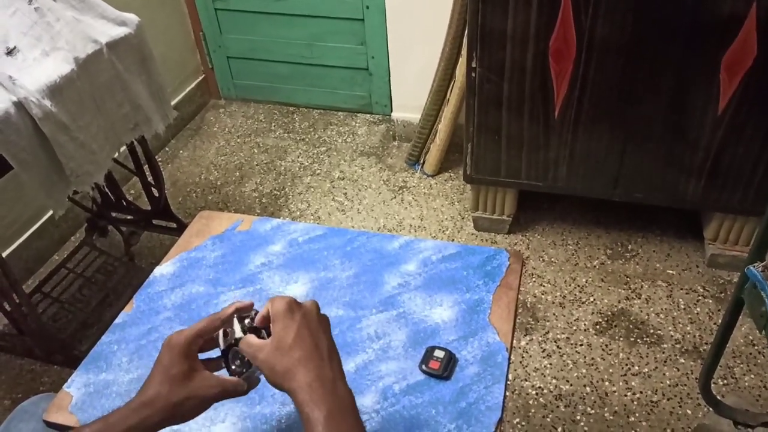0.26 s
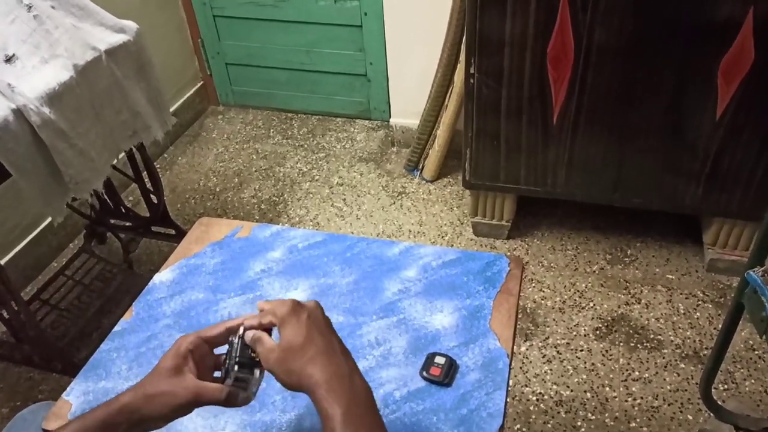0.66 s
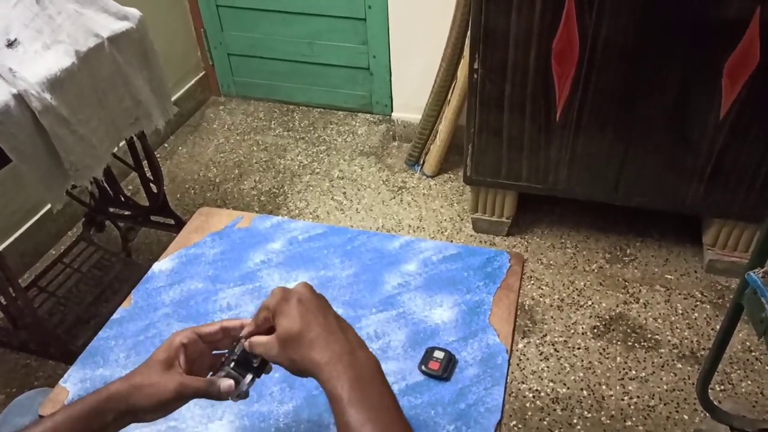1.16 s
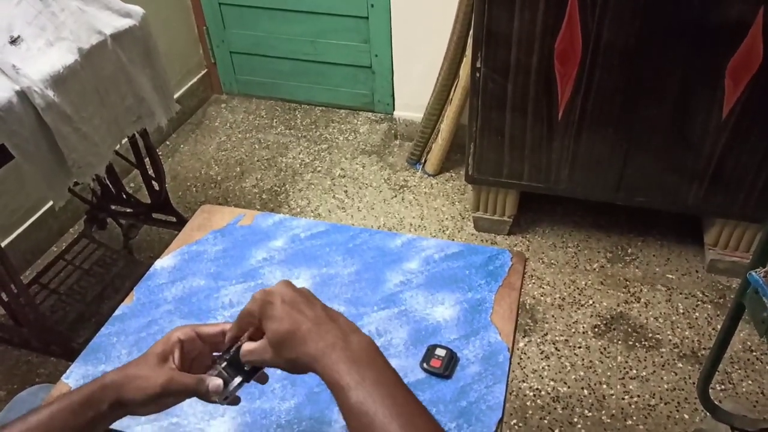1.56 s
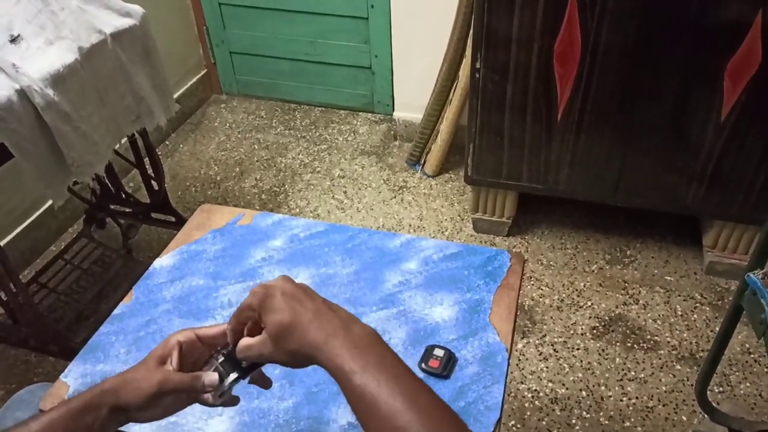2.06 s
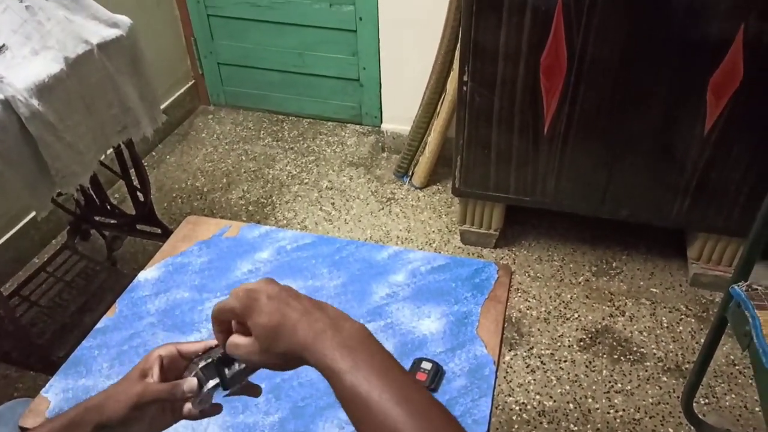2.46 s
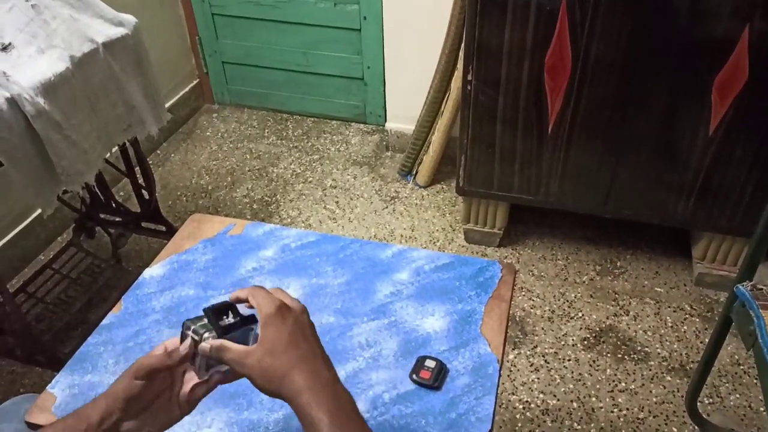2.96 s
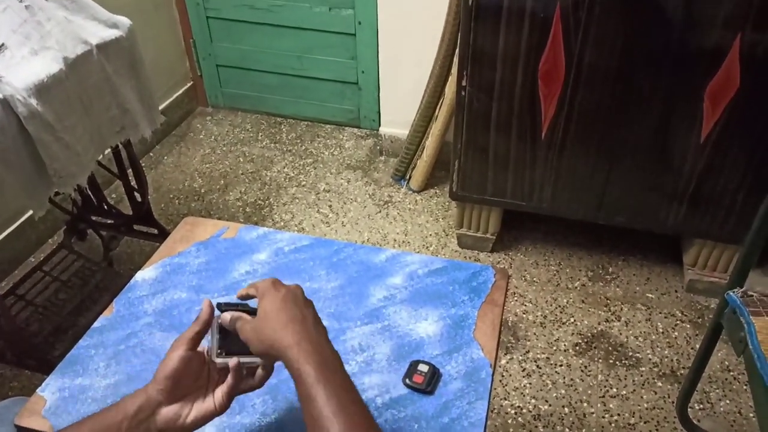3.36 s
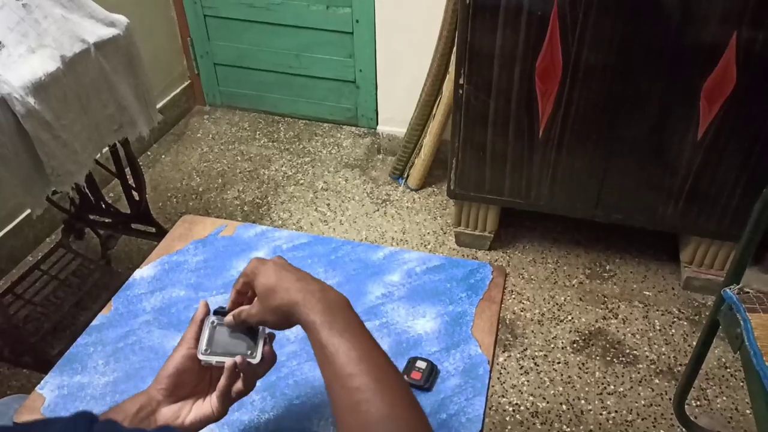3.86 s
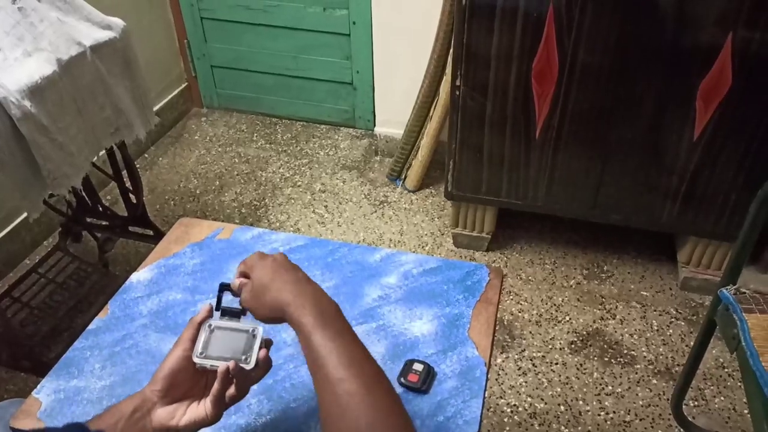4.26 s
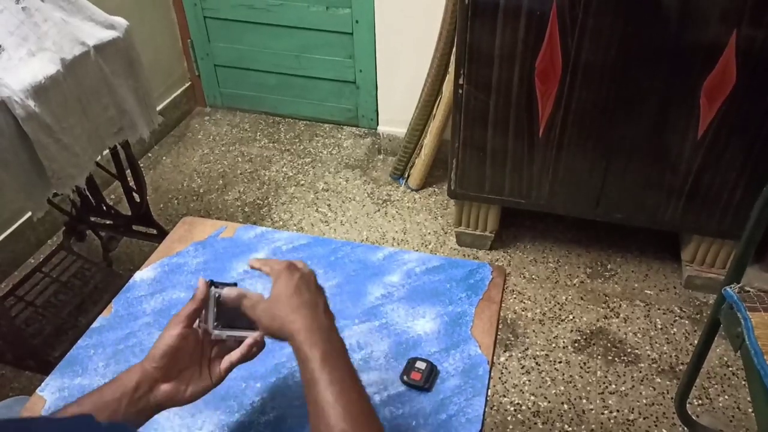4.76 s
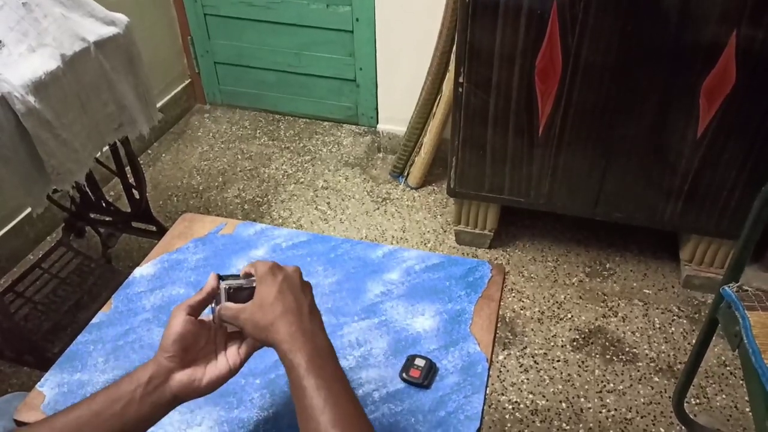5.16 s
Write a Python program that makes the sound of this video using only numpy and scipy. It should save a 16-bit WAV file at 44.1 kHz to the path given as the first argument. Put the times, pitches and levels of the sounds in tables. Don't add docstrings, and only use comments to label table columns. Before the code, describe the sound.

Hands open and shut a small hard plastic case with sharp ringing snaps and light taps in a bare tiled room over a low hum.

```python
import sys
import numpy as np
from scipy import signal
from scipy.fft import rfft, irfft
from scipy.io import wavfile
from scipy.ndimage import uniform_filter1d

SR = 44100
rng = np.random.default_rng(int(sys.argv[2]) if len(sys.argv) > 2 else 0)


def how_loud(loudness_db):
    steps = np.asarray(loudness_db, float) / 20
    return 10 ** steps


def int16_out(signal):
    q = np.round(np.clip(np.atleast_2d(signal).T, -1, 1) * 32767)
    wavfile.write(sys.argv[1], SR, q.astype(np.int16))


N = 238140
RING = 2 ** 14
TAIL = 15000
LEAD = 440


def on_log(table, hz):
    table_hz, value = np.transpose(table)
    return np.interp(np.log(hz + 1), np.log(table_hz), value)


def add(out, sound, start_s):
    i = int(start_s * SR - LEAD)
    out[:, i:i + sound.shape[1]] += sound[:, :N - i]


def walk(rate_hz):
    hold = int(SR / rate_hz)
    steps = np.repeat(rng.standard_normal(N // hold + 1), hold)
    return uniform_filter1d(uniform_filter1d(steps, hold), hold)[:N]


# pitch_hz, level_db
AIR_SPECTRUM = [(25, -31.5), (50, -20), (90, -8.5), (150, -5.5), (300, -10.5), (500, -13), (800, -17),
                (1400, -24.5), (3000, -27.5), (4400, -26.5), (8000, -31.5), (16000, -35.5)]
# pitch_hz, width_hz, level_db over the air
ROOM_HUM = [(112, 10.8, 10.5), (141, 8.5, 12), (174, 13.9, 6), (198.5, 4.7, 9), (282.3, 14.4, 10.5),
            (437, 71, 2.5)]
# pitch_hz, likeness (0-1)
EAR_LIKENESS = [(50, 0), (130, 0.9), (290, 0.68), (640, 0.34), (1500, 0), (16000, 0)]
# start_s, bustle_db
HAND_STIR = [
    (0.0, -68),
    (1.62, -71),
    (2.45, -67),
    (3.102, -70),
    (4.0, -67.5),
    (5.4, -68.5),
]


def room_tone():
    hz = np.fft.rfftfreq(N, 1 / SR)
    hum = 1 + sum(how_loud(db) ** 2 / (1 + (2 * (hz - f) / w) ** 2) for f, w, db in ROOM_HUM)
    like = np.clip(on_log(EAR_LIKENESS, hz), 0, 1)
    mid, side = rfft(rng.standard_normal((2, N))) * np.sqrt([1 + like, 1 - like])
    both = np.array([mid + side, (mid - side) * how_loud(-0.5)])
    both = both * how_loud(on_log(AIR_SPECTRUM, hz)) * np.sqrt(hum)

    part = np.clip(np.log(hz / 150 + 1e-9) / np.log(5), 0, 3)
    stir_db = np.interp(np.arange(N) / SR, *np.transpose(HAND_STIR))
    stir_db = stir_db - stir_db.mean()
    out = 0
    for k, stir_share in enumerate((0.1, 0.89, 0.262, 0.05)):
        swell_db = 1.2 * walk(3.1) + stir_share * stir_db
        crossfade = np.clip(1 - np.abs(part - k), 0, 1)
        out = out + irfft(both * crossfade, N) * how_loud(swell_db)
    return out * how_loud(-54) / np.sqrt(np.mean(out ** 2))


# delay_s, level_db
NEAR_ECHOES = [(.0017, -5.5), (.007, -8), (0.0105, -5.5), (0.0152, -8.5)]


def heard(t60_s, direct_db, echo_db, scatter):
    t = (np.arange(TAIL) - LEAD) / SR
    build = 1 - np.exp(-(t / 0.006) ** 2)
    fade_out = np.minimum((t[-1] - t) / 0.08, 1)
    tail = build * 1000.0 ** (-t / t60_s) * fade_out
    lead_in = how_loud(direct_db - 41) * np.exp(np.minimum(t, 0) / 0.004)
    path = scatter * np.where(t < 0, lead_in, tail)

    right_lag = 6
    path[0, LEAD] += how_loud(direct_db - 1.5)
    path[1, LEAD + right_lag] += how_loud(direct_db)
    left_lags = (5, -6, 19, -33)
    for (delay_s, db), each_db, lag in zip(NEAR_ECHOES, echo_db, left_lags):
        i = LEAD + int(delay_s * SR)
        path[[0, 1], [i + lag, i]] += how_loud(db + each_db) * np.array([1, -1])
    return rfft(path, RING)


def resonances(modes, hz, detune, scatter_db):
    ring = 0
    for k, ((f, w, db), d, s) in enumerate(zip(modes, detune, scatter_db)):
        mode = 1j * hz * w / ((f * d) ** 2 - hz ** 2 + 1j * hz * w)
        ring = ring + (-1) ** k * how_loud(db + s) * mode
    return ring / np.sqrt(np.mean(np.abs(ring) ** 2))


# pitch_hz, width_hz, level_db
LID_MODES = [(550, 120, -4.5), (844, 300, -10), (1218, 225, 1.8), (1340, 355, 1), (1789, 120, -2),
             (2150, 280, -7)]
SHELL_MODES = [(2513, 650, -8), (3210, 340, -1), (3755, 510, -2), (4150, 235, -1), (4360, 310, -3.9),
               (5570, 240, -1)]
LATCH_MODES = [(4650, 550, -18.5), (5355, 520, -2), (6280, 490, 3.7), (6900, 370, 3.5), (7670, 500, 3),
               (8540, 1140, -4)]
EDGE_MODES = [(9110, 420, 7), (11900, 1300, -3), (14200, 1100, -5), (15000, 400, -5)]
PART_T60_S = [0.35, 0.41, 0.34, 0.3]
PART_FACING_DB = [-0.5, -4, 2.5, 1]


def blow(*levels_db, direct_db):
    hz = np.fft.rfftfreq(RING, 1 / SR)
    grip = rng.standard_normal((4, 2, 6))
    echo_db = 26.2 + 0.54 * rng.standard_normal((4, 2))
    parts = (LID_MODES, SHELL_MODES, LATCH_MODES, EDGE_MODES)
    out = 0
    for modes, db, t60_s, facing_db, (shift, damp) in zip(
            parts, levels_db, PART_T60_S, PART_FACING_DB, grip):
        ring = resonances(modes, hz, 1 + 0.012 * shift, 1.5 * damp)
        glints = how_loud(2.08 * rng.standard_normal((2, TAIL)))
        scatter = rng.standard_normal((2, TAIL)) * glints
        out = out + how_loud(db - 0.5) * ring * heard(t60_s, direct_db + facing_db, echo_db, scatter)
    small_hz = 600
    return irfft(out * (1j * hz / (1j * hz + small_hz)) ** 2, RING)


# start_s, lid_db, shell_db, latch_db, edge_db
OPEN_HAND_SNAPS = [
    (0.6123, -49.5, -39, -33, -35.5),
    (2.572, -66, -55.5, -57, -56),
]
CUPPED_HAND_SNAPS = [
    (0.0754, -50, -29.5, -28.5, -34),
    (2.382, -51, -36, -22, -28.5),
    (4.4923, -40.5, -30, -26.5, -27),
]


def snaps(out):
    for table, direct_db in ((OPEN_HAND_SNAPS, 30), (CUPPED_HAND_SNAPS, 24.5)):
        for start_s, *levels_db in table:
            add(out, blow(*levels_db, direct_db=direct_db), start_s + 0.0006)


def lone_mode(hz, width_hz, t60_s):
    ring = resonances([(hz, width_hz, 0)], np.fft.rfftfreq(RING, 1 / SR), [1], [0]) ** 2
    ring = ring / np.sqrt(np.mean(np.abs(ring) ** 2))
    path = heard(t60_s, 26, np.full((4, 2), 21.0), rng.standard_normal((2, TAIL)))
    return irfft(ring * path, RING)


# [(start_s, level_db), ..]
PALM_TONES = [
    (198, 49, 0.12, [(2.55, -46.5)]),
    (280, 59, 0.51, [(2.534, -59)]),
    (473, 160, 0.35, [(2.534, -58.5)]),
    (836, 225, 0.66, [(2.534, -55.5), (3.277, -62), (3.64, -62.5), (3.813, -60), (3.932, -62), (4.494, -51.5)]),
]
LID_TONES = [
    (1125, 120, 0.32, [(4.494, -40)]),
    (1298, 130, .32, [(.076, -47.5), (.613, -51), (4.203, -61.5)]),
    (1458, 190, 0.21, [(2.383, -58.5), (3.277, -65.5), (4.929, -68), (4.987, -48.5)]),
    (1804, 210, 0.37, [(.076, -47), (4.494, -47.5)]),
]
SHELL_TONES = [
    (3250, 200, .2, [(2.865, -65)]),
    (3700, 226, .25, [(1.22, -57), (2.183, -55)]),
    (3460, 150, 0.45, [(.958, -58.5), (1.213, -63), (3.82, -66), (4.494, -42)]),
    (3900, 500, 0.35, [(.076, -33.5), (.613, -42.5)]),
    (4820, 1140, .37, [(2.383, -30.5), (4.494, -31.5)]),
    (4730, 91, 0.35, [(4.987, -49.5)]),
    (6300, 190, 0.37, [(.076, -30), (2.383, -31)]),
    (6970, 460, .28, [(.613, -42), (1.205, -65), (1.52, -71), (2.181, -65), (2.865, -81), (3.177, -75), (3.815, -70.5), (3.932, -65), (4.205, -60.5)]),
]


def lingering_rings(out):
    for hz, width_hz, t60_s, blows in PALM_TONES + LID_TONES + SHELL_TONES:
        for start_s, db in blows:
            add(out, how_loud(db) * lone_mode(hz, width_hz, t60_s), start_s)


# start_s, lid_db, shell_db, latch_db
FINGER_TAPS = [(0.955, -71, -59.5, -63.5), (1.014, -84, -65, -66.5), (1.204, -85, -57.5, -60),
               (1.22, -69, -61.5, -82), (1.519, -85, -78, -68.5), (1.935, -72, -61.5, -60),
               (2.18, -60.5, -55, -64), (2.506, -58.5, -62, -66), (2.534, -46.5, -46, -58),
               (2.863, -72, -76.5, -85), (3.177, -66.5, -70, -75), (3.276, -69, -69, -77.5),
               (3.64, -75, -68, -87), (3.678, -82, -64.5, -83.5), (3.812, -62.5, -60, -77),
               (3.829, -71, -77, -70), (3.931, -62, -73, -67), (4.06, -61.5, -79, -86),
               (4.203, -51, -54.5, -63), (4.211, -51, -56, -57.5), (4.987, -50, -47.5, -54.5)]


def taps(out):
    for start_s, lid_db, shell_db, latch_db in FINGER_TAPS:
        sound = blow(lid_db, shell_db, latch_db, latch_db - 10, direct_db=26.5)
        add(out, sound, start_s + 0.0006)


def squeak(length_s, start_hz, end_hz, octave_db, rough):
    u = np.linspace(0, 1, int(length_s * SR))
    waver = uniform_filter1d(rng.standard_normal((2, 4410)), size=40)[:, :len(u)]
    pitch_hz = (start_hz + (end_hz - start_hz) * u) * (1 + 0.022 * waver[0])
    phase = 2 * np.pi * np.cumsum(pitch_hz) / SR
    tone = np.sin(phase) + how_loud(octave_db) * np.sin(2 * phase + rough * waver[1])
    tone = tone * np.abs(np.sin(np.pi * u ** 0.76)) ** 0.65
    path = heard(0.27, 42, np.full((4, 2), 32.0), rng.standard_normal((2, TAIL)))
    return how_loud(-44.5) * irfft(rfft(tone, RING) * path, RING)


# start_s, length_s, start_hz, end_hz, level_db
HINGE_TURNS = [
    (3.197, 0.069, 12300, 15000, -74),
    (3.30, 0.095, 13100, 14800, -69),
    (5.096, .06, 13240, 14550, -72),
]


def hinge_squeaks(out):
    for start_s, length_s, start_hz, end_hz, db in HINGE_TURNS:
        add(out, how_loud(db) * squeak(length_s, start_hz, end_hz, -120, 0), start_s)


# start_s, length_s, pitch_hz, level_db
LATCH_SLIDES = [
    (4.45, 0.018, 6790, -24.5),
    (4.467, 0.012, 6900, -21.5),
    (4.478, 0.0095, 6900, -23),
    (4.487, 0.012, 6980, -30),
]


def latch_squeaks(out):
    for start_s, length_s, hz, db in LATCH_SLIDES:
        add(out, how_loud(db) * squeak(length_s, hz, hz, -21.5, 4.9), start_s)


def scene():
    out = room_tone()
    snaps(out)
    lingering_rings(out)
    taps(out)
    hinge_squeaks(out)
    latch_squeaks(out)
    return out


# pitch_hz, level_db
OVERALL_COLOUR = [(20, 0.5), (4700, -1), (5400, -9.5), (6100, -1), (8500, 1.5), (8750, -17.5), (9350, -17.5),
                  (9750, -25.5), (11300, -23.5), (11600, -1.5), (15500, 2.5), (15750, -34), (16500, -62.5),
                  (22000, -70.5)]


def overall_coloured(dry):
    size = 2048
    level = how_loud(on_log(OVERALL_COLOUR, np.fft.rfftfreq(size, 1 / SR)))
    cepstrum = irfft(np.log(level), size)
    cepstrum[1:size // 2] *= 2
    cepstrum[size // 2 + 1:] = 0
    colour = irfft(np.exp(rfft(cepstrum)), size)
    gap_band = signal.butter(4, (8800, 11500), "bandpass", fs=SR, output="sos")
    hiss = how_loud(-78.5) * signal.sosfilt(gap_band, rng.standard_normal(dry.shape))
    return signal.fftconvolve(dry, colour[None])[:, :N] + hiss


def band_limit(x):
    return signal.sosfilt(signal.butter(12, 16630, fs=SR, output="sos"), x)


def record(dry):
    mix = overall_coloured(dry)
    return band_limit(mix)


dry = scene()
out = record(dry)
int16_out(out)
```